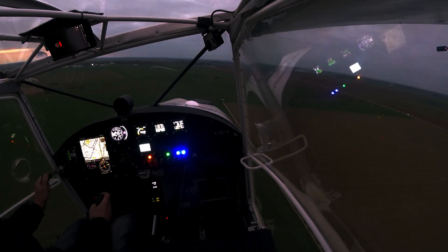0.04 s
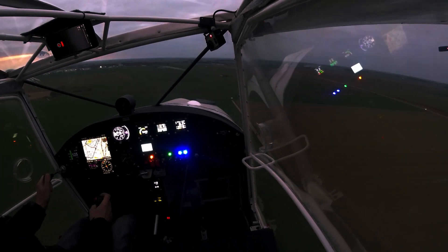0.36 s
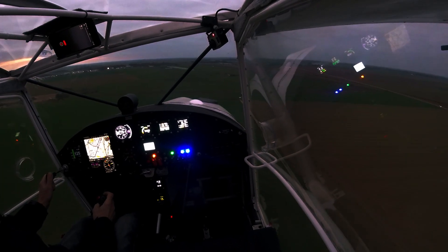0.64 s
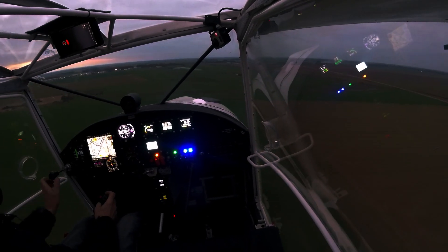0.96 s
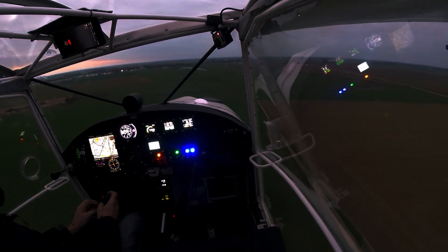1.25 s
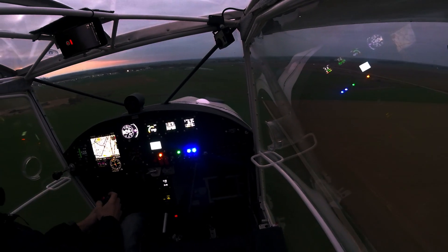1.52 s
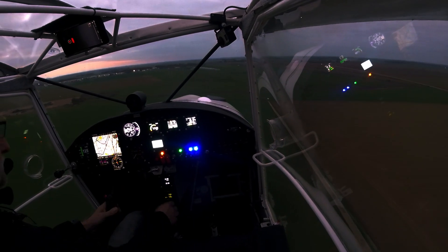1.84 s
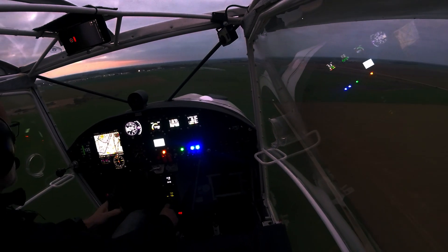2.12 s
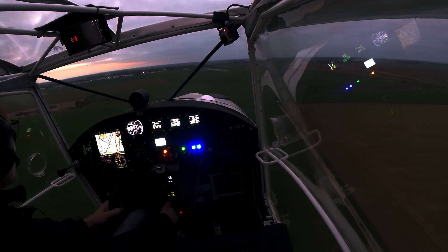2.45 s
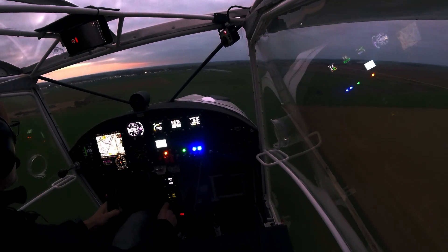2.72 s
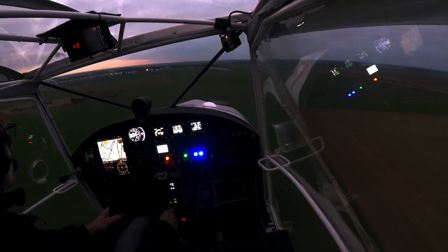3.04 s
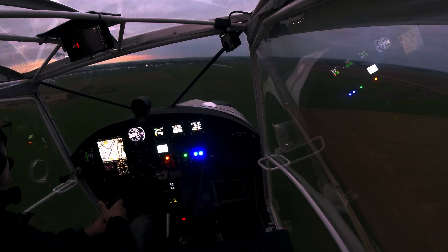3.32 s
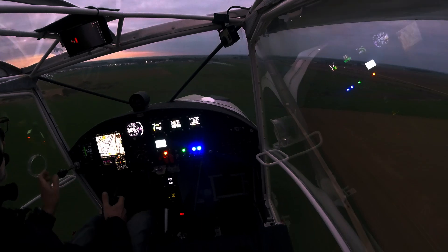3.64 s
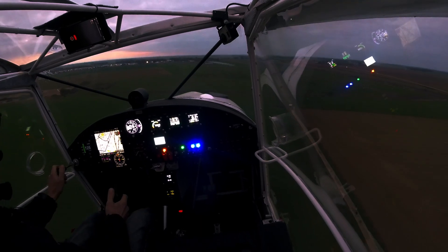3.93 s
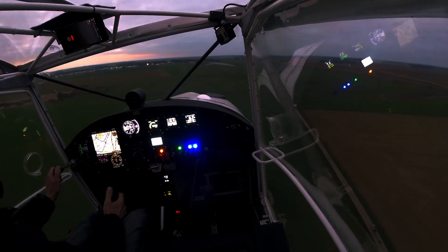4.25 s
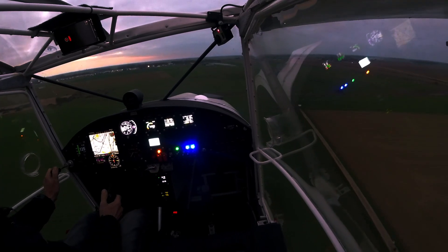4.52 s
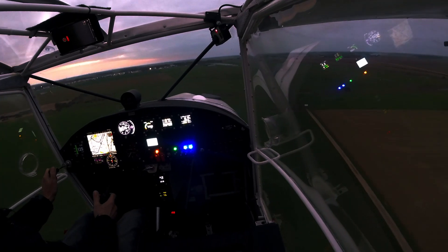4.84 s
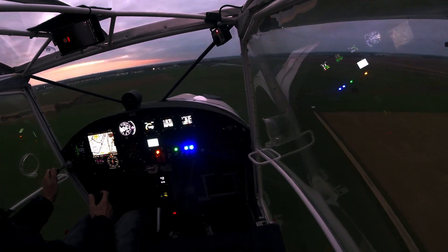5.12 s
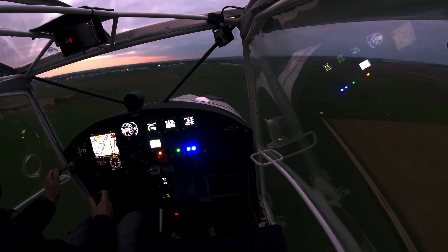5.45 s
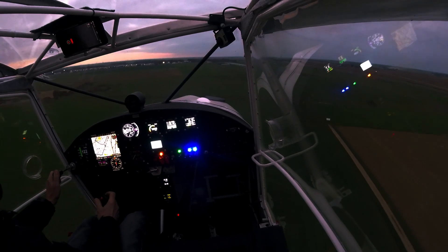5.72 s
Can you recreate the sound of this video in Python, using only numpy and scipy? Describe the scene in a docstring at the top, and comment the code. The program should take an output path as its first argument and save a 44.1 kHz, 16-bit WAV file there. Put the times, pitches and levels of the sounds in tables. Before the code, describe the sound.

Inside the draughty cockpit of a small descending plane, the propeller gives a steady low drone. Wind roars around the cabin and hisses through gaps, with a faint gear whine underneath. About halfway, the deepest tone dips briefly and two very faint ticks follow. Near the end the power eases back, so the drone falls in pitch and the wind weakens.

```python
"""Inside the draughty cockpit of a light aircraft on its descent. From the start the propeller drones in
three low harmonics, under the roar of the slipstream and the hiss of air through gaps in the frame.
As the shaft settles to approach speed, a gear whines faintly. About three seconds in, the deepest tone
dips briefly and something ticks lightly twice. Near the end the power is eased back: the drone falls
in pitch and the slipstream weakens. Throughout, a limiter holds the peaks."""
import sys
import numpy as np
from scipy import signal
from scipy.fft import rfft, irfft
from scipy.io import wavfile
from scipy.ndimage import uniform_filter1d, minimum_filter1d

SR = 44100
rng = np.random.default_rng(int(sys.argv[2]) if len(sys.argv) > 2 else 0)


def inscribe(sig):
    """Save sig as 16-bit PCM at rate SR to the path in sys.argv[1].

    A 1-D sig is mono; a 2-D sig holds one channel per row.
    Samples are clipped to [-1, 1] before scaling.
    """
    pcm = np.round(np.clip(np.atleast_2d(sig).T, -1, 1) * 32767)
    wavfile.write(sys.argv[1], SR, pcm.astype(np.int16))


N = 254898
TIME = np.arange(N) / SR
BIN_HZ = np.fft.rfftfreq(N, 1 / SR)

# peaks and nulls of the cabin's standing waves, which the tones glide through: centre_hz, width_hz, lift_db
STANDING_WAVES = [(56.5, 2.7, -2.5), (112.6, 2.6, 6.5), (158.6, 7, -4), (172.6, 2.65, -11),
                  (848.2, 24, 12.5)]


def gain_of(db):
    """Amplitude grows tenfold for every 20 decibels."""
    return 10 ** (np.asarray(db) / 20)


def unit_rms(x):
    """Normalises a signal to a mean power of one."""
    return x / np.sqrt(np.mean(x ** 2) + 1e-20)


def swell(centre_s, half_s):
    """A Gaussian envelope rises and falls around one moment."""
    return np.exp(-((TIME - centre_s) / half_s) ** 2)


def wander(rate_hz):
    """Low-passed noise gives a smooth random fluctuation of unit rms."""
    return unit_rms(irfft(rfft(rng.standard_normal(N)) * np.exp(-(BIN_HZ / rate_hz) ** 2), N))


def resonance_db(resonances, hz):
    """Each resonance adds a Lorentzian peak or notch to the level."""
    return sum(db / (1 + (2 * (hz - centre) / width) ** 2) for centre, width, db in resonances)


def in_cabin(noise, spectrum):
    """Source and filter: flow noise takes its own spectrum, then the resonances that it excites."""
    # cabin and gap resonances: centre_hz, width_hz, lift_db
    cabin_modes = [(305, 11.4, 3), (414, 37, 3.5), (672, 24, 2.5), (1287, 34, 3), (1520, 33, 1.5),
                   (1793, 30, 3), (3004, 51, 4), (3180, 60, 3.5), (3300, 45, 1.5), (3386, 28, 6.5),
                   (3580, 23, 7), (5444, 700, 7.5)]
    hz, db = np.transpose(spectrum)
    source_db = np.interp(np.log(BIN_HZ + 1), np.log(hz + 1), db)
    return unit_rms(irfft(rfft(noise) * gain_of(source_db + resonance_db(cabin_modes, BIN_HZ)), N))


def ticks(decay_s=0.022, centre_hz=7000, width_octaves=0.54):
    """Light taps with no ring: bright noise bursts that decay exponentially."""
    # ticks in the cockpit: start_s, level_db
    taps = [(2.969, -40), (3.186, -43)]
    band = np.exp(-(np.log2((BIN_HZ + 1) / centre_hz) / width_octaves) ** 2)
    fizz = unit_rms(irfft(rfft(rng.standard_normal(N)) * band, N))
    return fizz * sum(gain_of(db) * (TIME >= s) * np.exp(-abs(TIME - s) / decay_s) for s, db in taps)


def gear_whine(blade_cycles, blade_hz, order=15, base_db=-46, twist_rad=0.48, flutter=0.21):
    """Phase modulation: the twisting shaft blurs a tone locked to a multiple of the blade rate."""
    level_db = base_db + resonance_db(STANDING_WAVES, order * blade_hz)  # sings out at approach speed
    phase = 2 * np.pi * order * blade_cycles + twist_rad * wander(14)
    return gain_of(level_db) * np.sqrt(2) * (1 + flutter * wander(13)) * np.sin(phase)


def gap_hiss(blade_cycles, flow_db, base_db=-32.5, flow_power=0.9, throb=0.039, gust_db=0.35):
    """Jet noise from gaps in the frame, amplitude-modulated by blade wakes and quick small gusts."""
    # spectrum of the air through the gaps: frequency_hz, relative_db
    hiss_spectrum = [(500, -14), (1500, 1.5), (2200, 1.5), (3400, -0.5), (3950, -6.5), (4800, -7),
                     (5500, -7), (6600, -5.5), (8000, -10.5), (9300, -14.5), (10300, -22.5), (11500, -32),
                     (15000, -43)]
    drive = (1 + throb * np.cos(2 * np.pi * blade_cycles)) * gain_of(gust_db * wander(90))
    jets = in_cabin(drive * rng.standard_normal(N), hiss_spectrum)
    return gain_of(base_db + flow_power * flow_db) * jets


def slipstream_roar(flow_db, blade_hz, base_db=-13.1, flow_power=1.02,
                    wash_hz=230, wash_power=2.3, approach_hz=56.3):
    """Turbulence buffets the cabin; its deepest part is propeller wash, which fades as the shaft slows."""
    # spectrum of the buffeting: frequency_hz, relative_db
    roar_spectrum = [(5, -19), (20, -11), (37, 5), (55, 2), (120, 0), (180, -0.5), (240, -1), (350, -6.5),
                     (450, -7.5), (580, -13), (800, -17), (1300, -21.5), (2400, -30.5), (5000, -66)]
    # a lull and two gusts: centre_s, change_db
    gusts = [(.72, -1), (2.75, 0.5), (2.94, 1)]
    eddies = in_cabin(rng.standard_normal(N), roar_spectrum)
    wash = irfft(rfft(eddies) / (1 + (BIN_HZ / wash_hz) ** 6), N)
    wash_gain = np.minimum(blade_hz / approach_hz, 1) ** wash_power
    gust_db = sum(db * swell(s, half_s=0.064) for s, db in gusts)
    return gain_of(base_db + flow_power * flow_db + gust_db) * (eddies - wash + wash * wash_gain)


def propeller_drone(blade_cycles, blade_hz, flutter=0.048):
    """Periodic blade pulses form a harmonic series; standing waves lift or cut each tone as it glides."""
    # harmonics 1, 2 and 3 before the standing waves act: level_db
    harmonic_db = [-11.5, -24, -20]
    # brief dip of the deepest tone: centre_s, half_length_s, depth_db
    dip = (2.73, 0.055, -18)
    tones = []
    for k, db in enumerate(harmonic_db, 1):
        amplitude = np.sqrt(2) * gain_of(db + resonance_db(STANDING_WAVES, k * blade_hz))
        uneven_air = 1 + flutter * wander(9.6)
        # each blade pushes and then sucks, so the pressure swings equally both ways
        tones.append(amplitude * uneven_air * np.sin(2 * np.pi * k * blade_cycles))
    centre_s, half_s, depth_db = dip
    tones[0] *= gain_of(depth_db * swell(centre_s, half_s))
    return sum(tones)


def scene(reference_db=-31):
    """Superposition: propeller and gear share one shaft; one slipstream drives both roar and hiss."""
    # blade-passing rate, settling for the approach and then eased back: time_s, rate_hz
    blade_rate = [(0.0, 60.57), (0.15, 58.41), (0.6, 57.12), (1.5, 56.6), (2.7, 56.15), (3.4, 55.95),
                  (4.5, 56.35), (5.05, 51.4), (5.78, 50.43)]
    # slipstream strength: time_s, level_db
    airflow = [(0.0, -29), (0.13, -30.5), (3.03, -30.5), (3.36, -32), (4.41, -29), (4.6, -28.5),
               (4.81, -30), (5.25, -33), (5.78, -34)]
    blade_hz = np.interp(TIME, *np.transpose(blade_rate))
    flow_db = np.interp(TIME, *np.transpose(airflow)) - reference_db
    blade_cycles = np.cumsum(blade_hz) / SR
    tones = propeller_drone(blade_cycles, blade_hz) + gear_whine(blade_cycles, blade_hz)
    air = slipstream_roar(flow_db, blade_hz) + gap_hiss(blade_cycles, flow_db)
    return (tones + air + ticks())[None]


def record(dry, drive_db=0.02, ceiling_db=-2.5, recovery_db_per_s=120, cutoff_hz=15200):
    """Peak limiting: the gain drops at each high peak and recovers; a low-pass then limits the band."""
    driven = dry * gain_of(drive_db)
    over_db = np.maximum(20 * np.log10(abs(driven[0]) + 1e-9) - ceiling_db, 0)
    recovery_db = TIME * recovery_db_per_s
    reduction_db = np.maximum.accumulate(over_db + recovery_db) - recovery_db
    smooth_gain_db = uniform_filter1d(minimum_filter1d(-reduction_db, size=90), size=130)
    limited = driven * gain_of(smooth_gain_db) * signal.windows.tukey(N, 0.0006)
    lowpass = signal.firwin(1023, cutoff_hz, window=("kaiser", 9), fs=SR)
    return signal.oaconvolve(limited, lowpass[None], "same")


dry = scene()
out = record(dry)
inscribe(out)
```